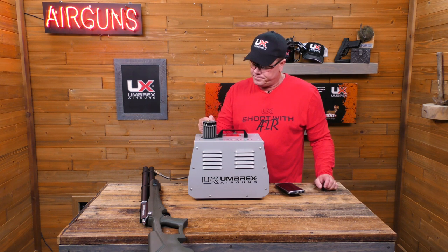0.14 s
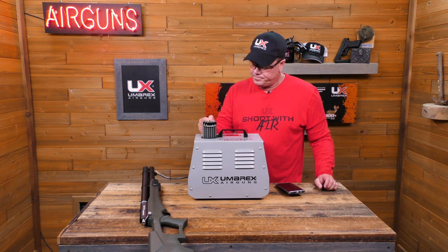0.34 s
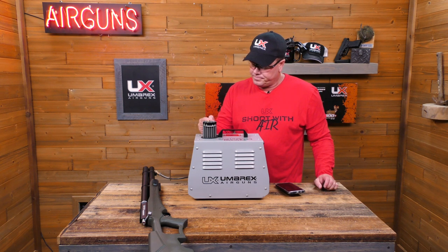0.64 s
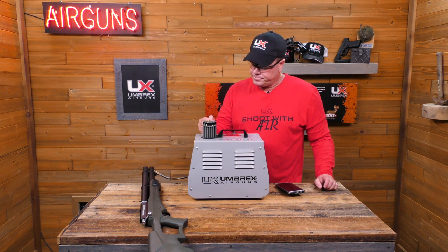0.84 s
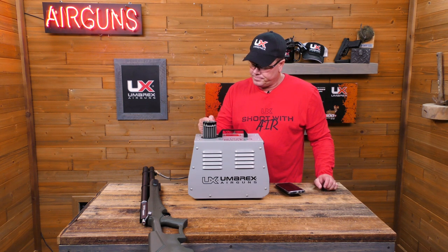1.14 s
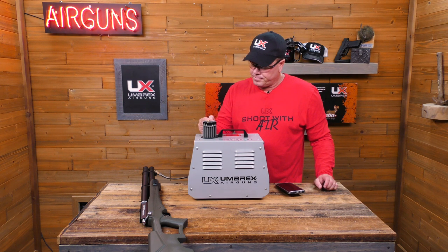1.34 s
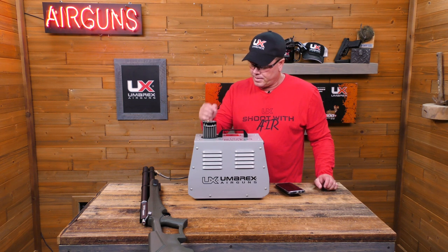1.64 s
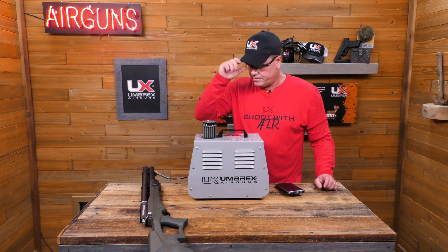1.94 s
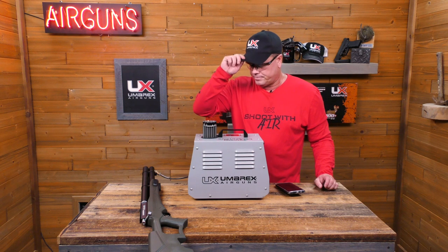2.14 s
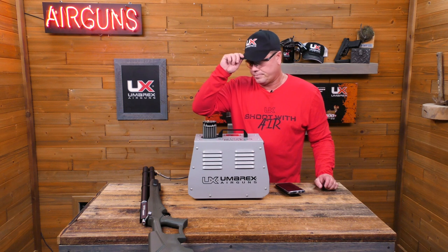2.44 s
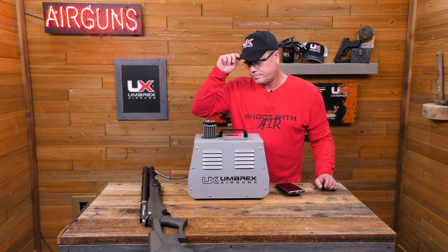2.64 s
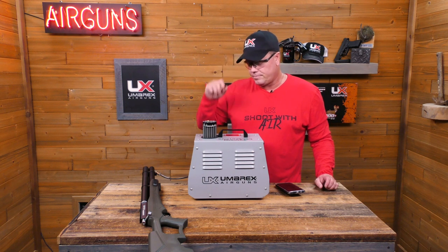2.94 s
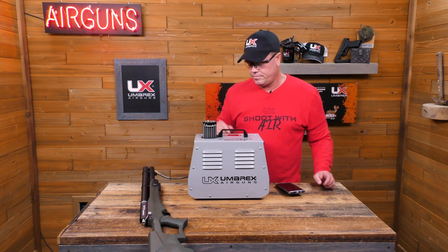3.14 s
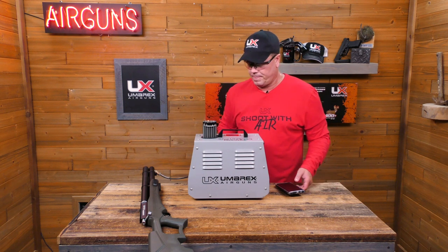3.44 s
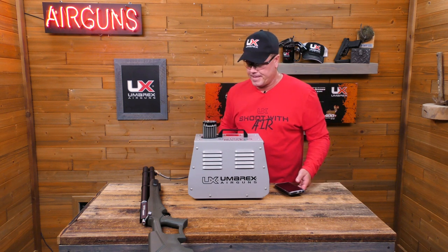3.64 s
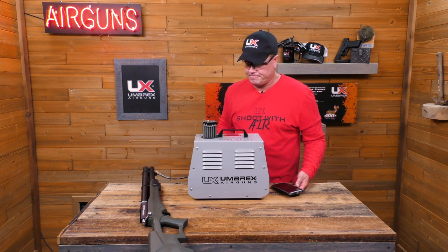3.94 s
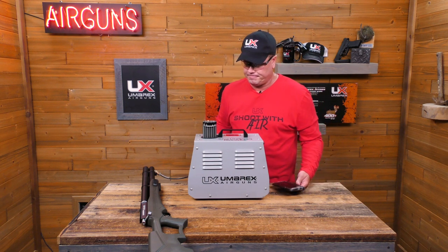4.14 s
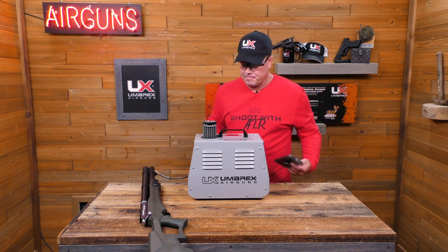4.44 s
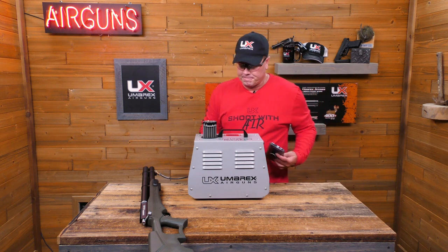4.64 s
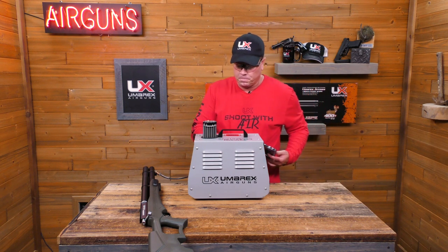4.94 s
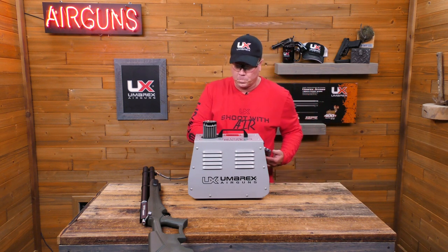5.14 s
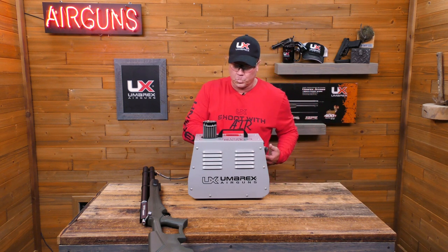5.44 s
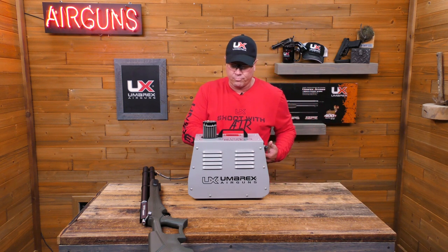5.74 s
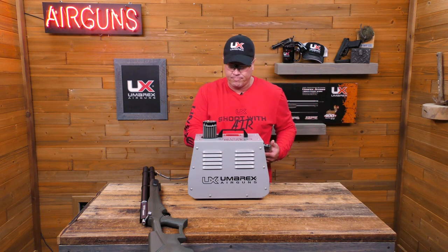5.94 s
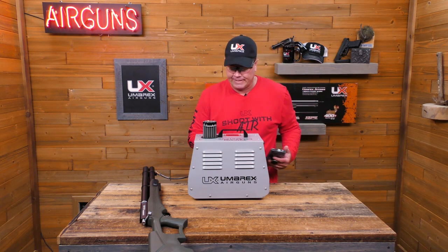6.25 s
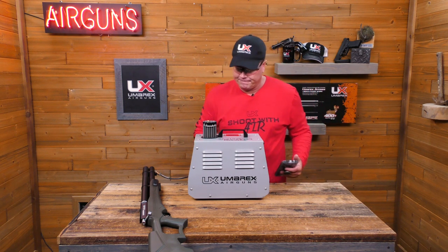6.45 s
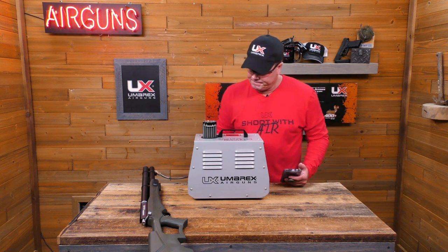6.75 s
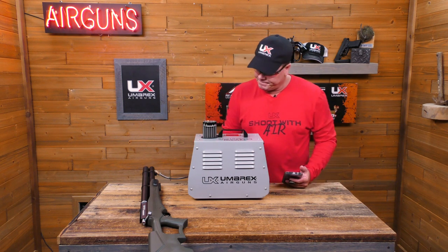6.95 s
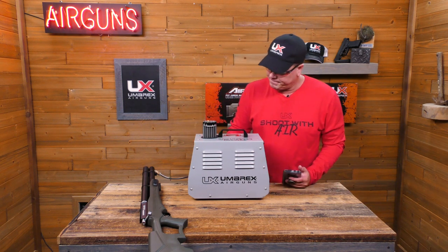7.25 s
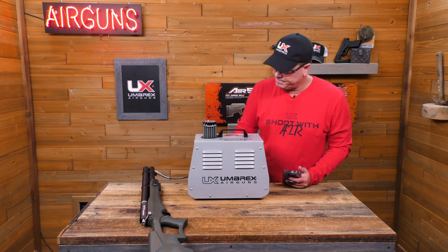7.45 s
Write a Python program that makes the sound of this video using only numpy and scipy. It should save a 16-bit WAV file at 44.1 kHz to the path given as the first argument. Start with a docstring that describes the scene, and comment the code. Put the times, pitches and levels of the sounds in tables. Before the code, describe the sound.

From 0 s a small geared air compressor is already running on a wooden table and continues to the end at about 7.6 s. A reedy, mid-high gear whine with buzzing overtones pulses rapidly, almost eight crank turns per second, swelling on two loaded strokes each turn. Between them, loose teeth knock and rattle the casing with a hard, hollow clack that repeats nearly alike. Low shaft hum, grainy air hiss and a constant soft fan rush lie beneath. Within the first half second the levels settle. Through 1-4 s speed and pitch sink very gradually as pressure builds, and the rattle hardens. Around 5-6.2 s the whine weakens while clatter comes forward; by 6.5-6.8 s the whine returns strongly. From about 6.8 s rattle and upper overtones are softer. The sound is close and dry, from a microphone worn by a man shifting behind the machine, and ends while still running.

```python
"""A gear whine comes first, with rattling teeth: a small geared air compressor runs on a wooden table, heard
from a microphone on a man who shifts behind it. A 9-tooth pinion drives an 88-tooth crank wheel: sines locked to
the teeth whine on both loaded strokes. In the slack between them, noise and knocks ring the casing and housing.
Shaft tones, hissing air and a steady fan lie beneath. Most flaws return every turn, and the crank slows as
the pressure builds."""
import sys
import numpy as np
from scipy import signal
from scipy.fft import rfft, irfft, next_fast_len
from scipy.io import wavfile
from scipy.ndimage import map_coordinates

SR = 44100
rng = np.random.default_rng(int(sys.argv[2]) if len(sys.argv) > 2 else 0)


def elevation(decibels):
    """Turn decibel levels (scalar or array-like) into linear amplitude ratios."""
    levels = np.asarray(decibels, float)
    return 10 ** (levels / 20)


def wav_out(sig):
    """Save sig, one row per channel (or a flat mono array), as 16-bit PCM at SR to the path in sys.argv[1]."""
    wavfile.write(sys.argv[1], SR, np.round(np.clip(np.atleast_2d(sig).T, -1, 1) * 32767).astype(np.int16))


N = 334719  # samples

# upper mesh overtones, before band changes and flicker:
# (multiple of tooth rate, return stroke level/dB, teeth engaging level/dB, full compression level/dB)
OVERTONES = [(4, -43, -51, -42), (5, -49, -55, -50), (6, -56, -58, -48), (7, -65, -66, -59),
             (8, -63, -68, -57), (9, -63, -60, -54), (10, -62, -67, -57), (11, -67, -78, -61),
             (12, -70, -69, -66), (13, -60, -60, -62), (14, -59, -63, -63), (15, -60, -59, -63),
             (16, -64, -59, -61), (17, -65, -62, -63), (18, -62, -62, -60), (19, -69, -69, -68),
             (20, -84, -71, -73), (21, -84, -78, -77), (22, -87, -88, -87)]
# resonances of the casing and of the housing, relative levels: (f/Hz, width of one filter pass/Hz, level/dB)
CASING = [(342.7, 26.2, -7), (402.6, 31, -1.5), (457.6, 56, 0), (560, 63, -6.5), (658.2, 67.5, 1.5)]
HOUSING_LOW = [(214, 58, -29.5), (805, 56.5, 1.5), (1062, 131, -3.5), (1257.6, 95, 8), (1376, 190, -0.5)]
HOUSING_HIGH = [(1569, 99, 2), (1807, 71, 0.5), (1977, 51, 0.5), (2320, 75, -12.5)]
# tone colour of the escaping air and of the fan, relative levels: (f/Hz, level/dB)
HISS_COLOUR = [(1290, -24.5), (2200, 0), (2490, -10.5), (2720, -6.5), (2910, -14.5), (3340, -8.5),
               (3750, -15), (4000, -13.5), (4990, -15.5), (5370, -13), (7700, -15.5), (11200, -7),
               (15600, -21.5)]
FAN_COLOUR = [(25, -21.5), (120, -35.5), (270, -27), (400, -21.5), (700, -27), (1000, -17), (1500, -20),
              (2100, -22.5), (2600, -42), (3300, -62)]

TEETH, PINION = 88, 9  # teeth on the crank wheel and on the pinion
STEPS = 5800  # points stored round one crank turn
START_TURNS, SPEED, SLOWS = 1.21607, 7.73684, .0436165  # turns; turns per s; turns per s lost each second
EASE_S, EASE = 4.2134, .4567  # from this time (s) the slowing eases by this share
FILL_FROM, FILL_TURNS = 4, 48  # pressure builds from this turn, over this many turns

# Round one crank turn: slack 0-.18, return stroke .18-.5, idle .5-.72, compression .72-1.
# how the mesh speed sags under load: (angle/turns, change at low pressure/%, change at high pressure/%)
SAG = [(0, -3.5, -3), (.04, 1.5, .3), (.1, -3.5, -1.6), (.15, -3, 2.5), (.2, -.6, .1), (.28, -.1, .1),
       (.4, -.7, -1.5), (.62, -1.9, -1.8), (.68, -.5, -2.5), (.77, 2.5, 2.4), (.86, 1.5, 1.8)]
# shapes of whine, rattle, hiss and hum round the turn; each use sets its own depth and overall level:
# (angle/turns, low pressure level/dB, high pressure level/dB)
WHINE_TURN = [(0, -20, -17.5), (.03, -24, -23), (.09, -26, -18), (.17, -21.5, -20), (.235, -17.5, -19),
              (.34, -22, -16.5), (.48, -25, -21.5), (.51, -33, -34), (.53, -40, -31), (.62, -35, -39.5),
              (.72, -33.5, -31.5), (.81, -27.5, -25), (.875, -22.5, -22.5), (.93, -15.5, -19),
              (.965, -17.5, -15)]
RATTLE_TURN = [(.002, -30, -34.5), (.018, -29.5, -25.5), (.06, -26.5, -29), (.1, -29, -35),
               (.2, -31.5, -35), (.34, -50, -44.5), (.49, -54, -39), (.56, -57, -37.5), (.76, -33, -41.5),
               (.85, -59, -46), (.985, -58, -55)]
HISS_TURN = [(0, -40, -38), (.08, -41, -44.5), (.2, -41.5, -45.5), (.27, -44.5, -47), (.45, -48.5, -44),
             (.54, -60, -50), (.62, -62, -54), (.69, -53.5, -55), (.77, -57.5, -58), (.85, -55, -53),
             (.96, -51, -50)]
HUM_TURN = [(0, -36, -27), (.045, -26.5, -34), (.1, -41, -22), (.14, -22, -32.5), (.18, -33, -35),
            (.24, -39.5, -42), (.34, -36.5, -29.5), (.45, -37.5, -36), (.55, -41.5, -29.5),
            (.67, -53.5, -34.5), (.82, -36.5, -41), (.93, -49, -36.5)]
# whine at the microphone, before a small overall cut: (t/s, compression level/dB, return stroke level/dB)
WHINE_LEVEL = [(0, -21.5, -22), (1.4, -19.5, -21.5), (4.2, -19, -20.5), (4.6, -20.5, -19.5),
               (4.9, -22.5, -21.5), (5.2, -24, -27), (6.0, -25.5, -30), (6.2, -24, -27.5), (6.45, -20, -20),
               (6.8, -20.5, -19), (7.2, -21, -22), (7.59, -22, -22.5)]
# where the man stands: (t/s, stepped behind the box/0-1, turned aside/0-1)
STANCE = [(4.5, 0.3, 0), (5.2, 0.18, 0.04), (5.6, 0.6, 0), (6.0, 0.6, 0.03), (6.2, 0.6, 0.05),
          (6.45, 0.36, 0.2), (6.8, 0.14, 0.8), (7.2, 0, 1), (7.59, 0, 1)]
GROWS_S = 0.27  # time constant (s) with which levels settle at the start

# each layer: (base level/dB, then changes/dB: at full pressure, at the start, man behind the box, turned aside)
TOOTH = (-37, -0.3, -2.5, -3, -8)
THIRD_PUSH = (-43.5, 8, -3, 2.5, -2.5)
THIRD_RETURN = (-33.5, -4, 3.5, 4.5, -3)
HUM = (-41, 2.5, -4, 2, -2.5)
LOW_RATTLE = (-36.5, 6, -5, 2.5, -6)
HIGH_RATTLE = (-41.5, 2, 1, 6, -4)
CLACK = (-8, -2, -6, 8.5, -5)
DULL = (-45, 1.5, -1.1, 1.4, -0.5)
BRIGHT = (-53, -0.5, -0.5, 0.5, -1.5)
# the same columns, but the base is added to other levels: fifth overtone, shaft tones within the casing's range
FIFTH = (0.47, 2.1, -2.2, -0.42, -0.76)
SHAFT_HUM = (0, 2.5, -5, 4, -4.5)

LAG_BEHIND, LAG_ASIDE = -0.026, 0.0094  # turns by which the whine's strokes come later with the stance
BITE, BITE_LATER, BITE_DB = .15, 0.0472, 11.5  # teeth bite: angle, delay at full pressure (turns), jump (dB)
# fourth and sixth overtone; only the rise and fall is used, enlarged: (t/s, fourth level/dB, sixth level/dB)
EVEN_OVERTONES = [(0, -47, -59), (1.7, -44.5, -56), (2.4, -45.5, -53.5), (4.4, -47.5, -54.5),
                  (5.4, -48.5, -55), (6.7, -46.5, -52), (7.1, -50, -58), (7.59, -46, -54)]
# steady tones locked to motor and crank: (cycles per crank turn); the last, 86, is the tooth tone running a
# little slow, held by the casing
SHAFT_ORDERS = [88 / 9, 15, 88 / 3, 46, 50, 54, 59, 73, 86]
# their levels before swell and waver: (level/dB)
SHAFT_DB = [-60, -64, -69, -55.5, -51, -42, -54.5, -51, -44]


def unit(x):
    """Bring to an rms (average strength) of 1."""
    return x / np.sqrt(np.mean(x ** 2) + 1e-20)


def curves(rows):
    """One value per sample for each column after the time."""
    s, *cols = np.transpose(rows)
    return [np.interp(np.arange(N) / SR, s, c) for c in cols]


def filtered(x, response):
    """Filter x by a complex response of frequency."""
    m = next_fast_len(N + 8192)
    return irfft(rfft(x, m) * response(np.fft.rfftfreq(m, 1 / SR)), m)[:N]


def colour(points):
    """Gain through (f/Hz, level/dB) points on a log frequency axis."""
    f, db = np.transpose(points)
    return lambda hz: elevation(np.interp(np.log(hz + 1), np.log(f + 1), db))


def modes(table):
    """Resonances with steep skirts: a sum of modes with alternating signs, applied twice."""
    def response(f):
        total = 0
        for k, (centre, width, db) in enumerate(table):
            damping = 1j * f * width
            total = total + (-1) ** k * elevation(db / 2) * damping / (centre ** 2 - f ** 2 + damping)
        return total ** 2
    return response


def ringing(x, table):
    """x through resonances that pass white noise at its own level."""
    response = modes(table)
    return filtered(x, response) / np.sqrt(np.mean(abs(response(np.fft.rfftfreq(SR, 1 / SR))) ** 2))


def wobble(position):
    """A smooth random curve, one knot per unit of position."""
    return map_coordinates(rng.standard_normal(int(position.max()) + 4), [position])


def lobe(crank, centre, width):
    """A swell around one crank angle, both settings in turns."""
    return np.exp(-((crank % 1 - centre) / width) ** 4)


def turns():
    """Crank turns at every sample: the speed falls steadily, later more slowly."""
    t = np.arange(N) / SR
    eased = EASE * np.maximum(t - EASE_S, 0) ** 2
    return START_TURNS + SPEED * t - SLOWS / 2 * (t ** 2 - eased)


def pressure(crank):
    """Tank pressure 0-1, growing with the turns made."""
    return np.clip((crank - FILL_FROM) / FILL_TURNS, 0, 1)


def heard(layer, crank):
    """Level in dB of a layer, from pressure, settling and the man's stance."""
    db, full_db, start_db, behind_db, aside_db = layer
    behind, aside = curves(STANCE)
    settling = np.exp(-np.arange(N) / SR / GROWS_S)
    return (db + full_db * pressure(crank) + start_db * settling
            + behind_db * behind + aside_db * aside)


def by_angle(table, angle):
    """The low and the high pressure column of a table read round the crank."""
    at, *cols = np.transpose(table)
    return [np.interp(angle % 1, at, c, period=1) for c in cols]


def rising(table, crank):
    """The two columns blended as the pressure builds."""
    low, high = by_angle(table, crank)
    return low + pressure(crank) * (high - low)


def flaws(crank, memory_turns, fresh):
    """Noise that repeats every turn, wears into a new pattern over some turns, plus a share that never repeats."""
    age = crank / memory_turns
    phases = rng.random((int(age.max()) + 2, STEPS // 2 + 1))
    patterns = unit(irfft(np.exp(2j * np.pi * phases), STEPS))
    old = age.astype(int)
    step = (crank % 1 * STEPS).astype(int)
    fade = age % 1 * np.pi / 2
    kept = np.cos(fade) * patterns[old, step] + np.sin(fade) * patterns[old + 1, step]
    fresh = np.clip(fresh, 0, 1)
    return np.sqrt(1 - fresh) * kept + np.sqrt(fresh) * rng.standard_normal(N)


def tooth_phase(crank):
    """Teeth passed: speed sags under load and what is lost is made up in the slack."""
    grid = np.arange(STEPS) / STEPS
    slack = np.clip(grid / .12, 0, 1)
    lags = [np.cumsum(sag) / 100 / STEPS for sag in by_angle(SAG, grid)]
    low, high = [np.interp(crank % 1, grid, lag - lag[-1] * slack) for lag in lags]
    return TEETH * (crank + low + pressure(crank) * (high - low))


def mesh(crank):
    """Gear whine: sines at multiples of the tooth rate, loud while the teeth carry load."""
    t = np.arange(N) / SR
    phase = 2 * np.pi * tooth_phase(crank) + 0.0074 * wobble(300 * t)
    back = lobe(crank, centre=0.24, width=0.43)  # 1 on the return stroke
    load_db = whine_load(crank)
    push_db, return_db = curves(WHINE_LEVEL)
    whine_db = back * return_db + (1 - back) * push_db - 1.5
    sound = elevation(whine_db) * unit(elevation(load_db) * np.sin(2 * phase))  # the main whine is twice the tooth rate

    tooth_db = 0.74 * rising(HUM_TURN, crank) + 0.14 * load_db
    sound += elevation(heard(TOOTH, crank)) * unit(elevation(tooth_db) * np.sin(phase + 1.5))

    third_db = 0.53 * load_db + 9.7 * lobe(crank, centre=0.853, width=0.084)
    third_db -= 3.4 * lobe(crank, centre=0.96, width=0.032)
    third = elevation(third_db) * np.sin(3 * phase + 2.3)
    third_level_db = back * heard(THIRD_RETURN, crank) + (1 - back) * heard(THIRD_PUSH, crank)
    sound += elevation(third_level_db) * unit(third)
    return sound + overtones(crank, phase)


def whine_load(crank):
    """How load shapes the whine round each turn, in dB: it drops while the teeth are apart."""
    behind, aside = curves(STANCE)
    angle = crank - LAG_BEHIND * behind - LAG_ASIDE * aside
    bite = BITE + BITE_LATER * pressure(crank)
    apart = np.clip((bite - angle % 1) / 0.0081, 0, 1) * np.clip(angle % 1 / 0.11, 0, 1)
    load_db = rising(WHINE_TURN, angle) - BITE_DB * apart
    load_db += 4 * aside ** 2 * lobe(crank, centre=0.823, width=0.035)
    load_db += 0.32 * np.sin(2 * np.pi * crank * TEETH / PINION)  # the pinion is slightly off centre
    return load_db - 6 * lobe(crank, centre=0.068, width=0.052)  # teeth apart


def overtones(crank, phase):
    """Upper mesh overtones, which flicker as single teeth touch."""
    t = np.arange(N) / SR
    engage = 1.2 * np.exp(-((crank % 1 - .785) / 0.061) ** 2)
    full = lobe(crank, centre=0.925, width=0.064)
    idle = elevation(-12) * lobe(crank, centre=0.584, width=0.089)  # the teeth still touch lightly
    # on the return stroke the highest overtones fade first
    long_return = lobe(crank, centre=.33, width=.16)
    short_return = lobe(crank, centre=.26, width=.11)

    fourth_db, sixth_db = [1.6 * (db - db.mean()) for db in curves(EVEN_OVERTONES)]
    dull_db, bright_db = [heard(layer, crank) - layer[0] for layer in (DULL, BRIGHT)]
    bands_db = [fourth_db + 2.0, heard(FIFTH, crank), sixth_db + 1.0, dull_db, bright_db]
    sound = 0
    for k, *stroke_db in OVERTONES:
        band_db = bands_db[(k > 4) + (k > 5) + (k > 6) + (k > 11)]
        flicker_db = 0.53 * min(k, 14.5)  # a fixed lift that goes with the flicker
        flicker_db = flicker_db + (1.44 + 1.5 * (k > 6)) * wobble(60 * t)
        flicker_db += (0.61 + 1.3 * (k > 6)) * wobble(0.81 * t)
        strokes = [long_return if k < 6.5 else short_return, engage, full + idle]
        size = sum(elevation(db) * stroke for db, stroke in zip(stroke_db, strokes))
        slip = .0038 * k ** 2 * wobble(200 * t)  # radians
        tone = np.sin(round(k) * phase + slip + 9.5 * rng.random())
        sound = sound + size * elevation(band_db + flicker_db) * tone
    return sound


def shafts(crank):
    """Tones locked to motor and crank; those in the casing's range swell with it and waver."""
    stroke_db = rising(HUM_TURN, crank)
    casing_db = heard(SHAFT_HUM, crank) + 0.63 * (stroke_db - stroke_db.mean())
    sound = 0
    for order, db in zip(SHAFT_ORDERS, SHAFT_DB):
        swell_db = (order > TEETH / 2) * (casing_db + 2.8 * wobble(crank / 3))
        level_db = db + swell_db + 0.55 * wobble(crank)
        sound = sound + elevation(level_db) * np.sin(2 * np.pi * (order * crank + rng.random()))
    return sound


def once_a_turn(crank, angle):
    """A one-sample knock each time the crank passes an angle, a little uneven in strength."""
    passes = np.diff(np.floor(crank - angle), prepend=0) > 0
    return passes * elevation(1.7 * wobble(crank))


def housing(crank):
    """Loose teeth knock the housing and shake the casing, in much the same way every turn."""
    hum_db, low_db, high_db, clack_db = [heard(x, crank) for x in (HUM, LOW_RATTLE, HIGH_RATTLE, CLACK)]
    # the wheel runs over dead centre and hits the far flank of the pinion twice
    clack = once_a_turn(crank, .01196) + 0.57 * once_a_turn(crank, .045)
    valve = once_a_turn(crank, .27)  # a valve seats on the return stroke
    knock = elevation(1.14 * rising(RATTLE_TURN, crank))
    hum = unit(elevation(1.23 * rising(HUM_TURN, crank)) * flaws(crank, memory_turns=18.74, fresh=0.035))
    low = unit(knock * flaws(crank, memory_turns=13.8, fresh=0.23))
    high = unit(knock * flaws(crank, memory_turns=16.5, fresh=0.12))
    hum += elevation(26.5) * clack
    low += elevation(27) * clack
    return (elevation(hum_db) * ringing(hum + elevation(34) * valve, CASING)
            + elevation(low_db) * ringing(low, HOUSING_LOW)
            + ringing(elevation(high_db) * high + elevation(clack_db) * clack, HOUSING_HIGH))


def hiss(crank):
    """Sliding seals and air through the valves: grainy noise, its strokes reshaped as the pressure builds."""
    grain = elevation(0.93 * wobble(900 * np.arange(N) / SR))
    air = filtered(grain * flaws(crank, memory_turns=3.056, fresh=0.85), colour(HISS_COLOUR))
    dull = filtered(air, lambda hz: 1 / (1 + (hz / 7700) ** 6))
    top = filtered(air, lambda hz: 1 / (1 + (12000 / (hz + 1)) ** 8))
    middle = air - dull - top
    stroke_db = rising(HISS_TURN, crank)
    swell_db = stroke_db - stroke_db.mean()
    # the higher the hiss, the deeper it dips between strokes
    bright = elevation(.9 * swell_db) * middle + elevation(1.7 * swell_db) * top * .75
    bright_db = heard(BRIGHT, crank)
    bright_db -= 4.1 * lobe(crank, centre=0.072, width=0.11)  # the bright part dips in the slack
    return elevation(heard(DULL, crank)) * unit(elevation(0.67 * swell_db) * dull) + elevation(bright_db) * unit(bright)


def fan():
    """The cooling fan's steady rush: coloured noise."""
    return elevation(-43) * unit(filtered(rng.standard_normal(N), colour(FAN_COLOUR)))


def scene():
    """Everything on the table, one channel."""
    crank = turns()
    return (mesh(crank) + shafts(crank) + housing(crank) + hiss(crank) + fan())[None]


def roll_off(x):
    """The treble ends steeply here."""
    return signal.sosfilt(signal.butter(12, 15710, fs=SR, output="sos"), x)


def record(dry):
    """The microphone is slightly lopsided: loud whine leaves a low thump that follows its swell."""
    def thump_band(hz):
        low_cut = 1j * hz / 14 / (1 + 1j * hz / 14)
        return low_cut / (1 + (hz / 38) ** 4)
    thump = filtered(dry[0] ** 2, thump_band)
    return roll_off(dry - elevation(-9.0) * thump)


dry = scene()
out = record(dry)
wav_out(out)
```